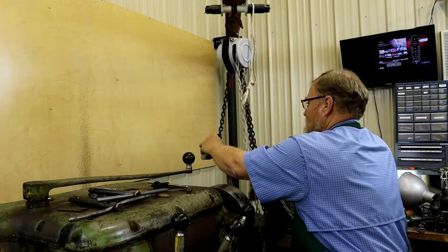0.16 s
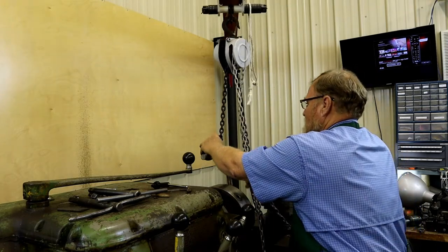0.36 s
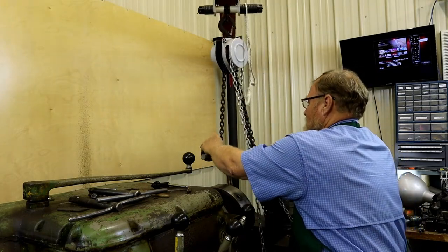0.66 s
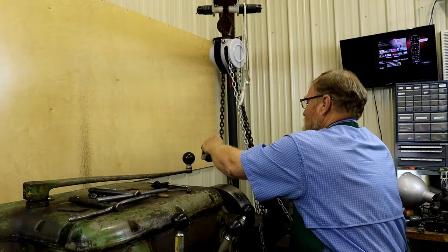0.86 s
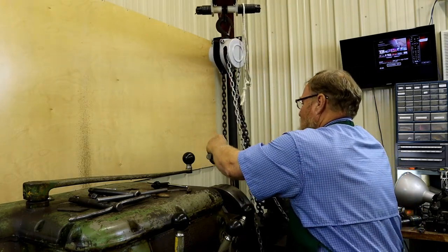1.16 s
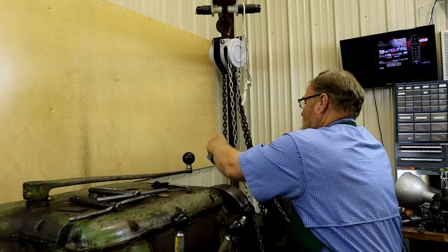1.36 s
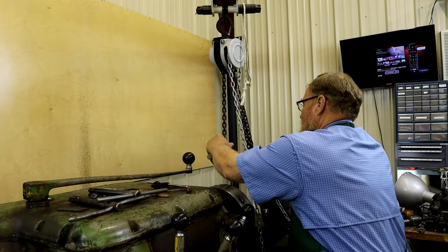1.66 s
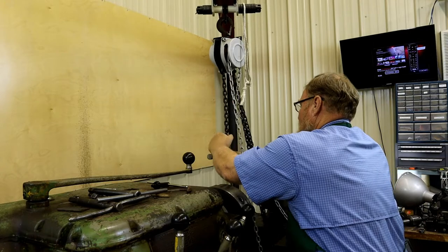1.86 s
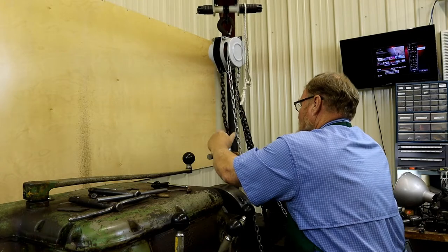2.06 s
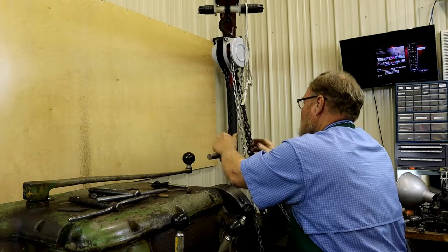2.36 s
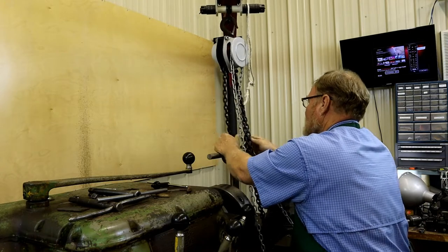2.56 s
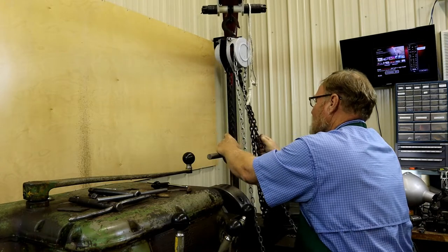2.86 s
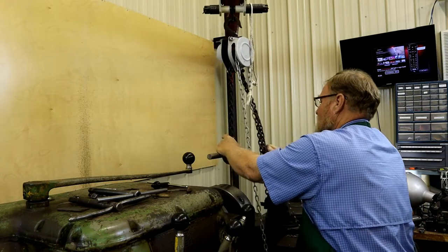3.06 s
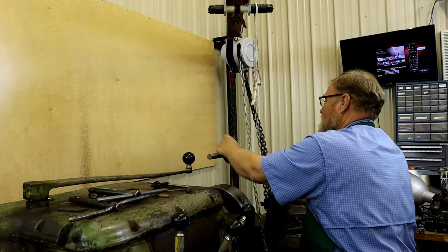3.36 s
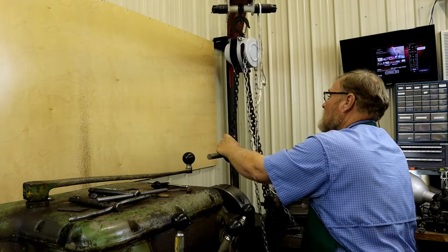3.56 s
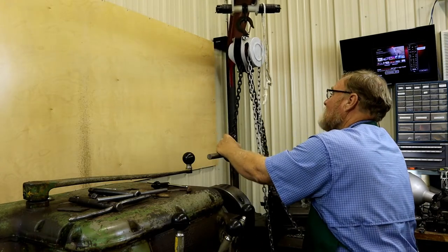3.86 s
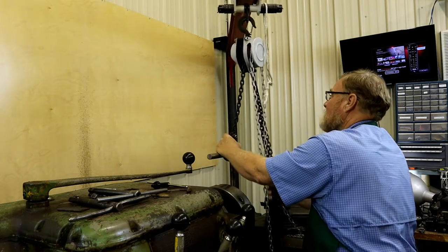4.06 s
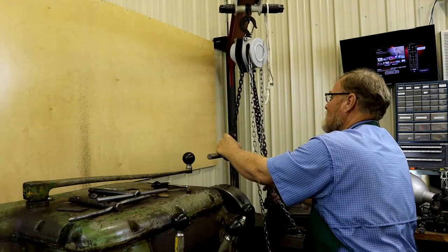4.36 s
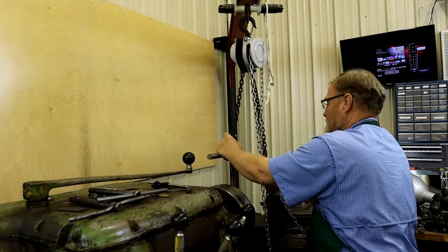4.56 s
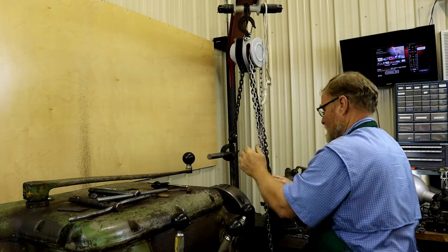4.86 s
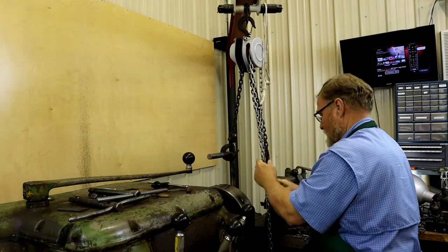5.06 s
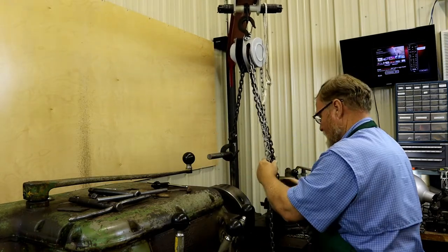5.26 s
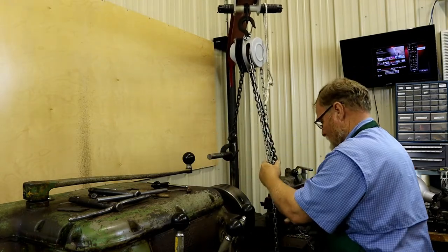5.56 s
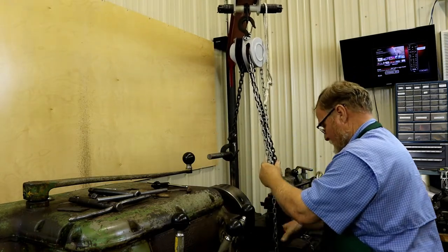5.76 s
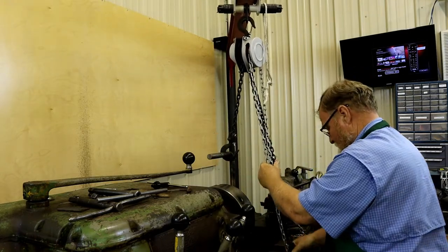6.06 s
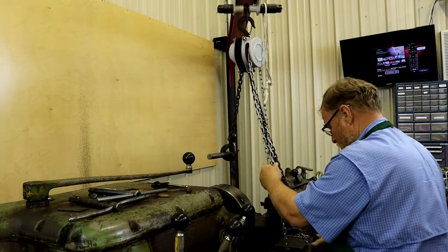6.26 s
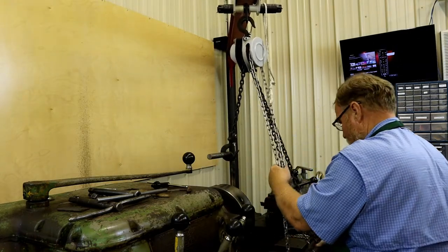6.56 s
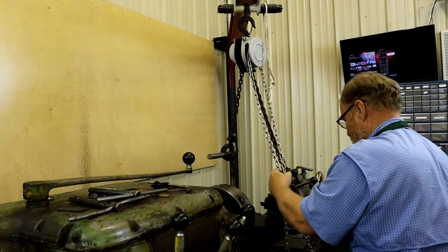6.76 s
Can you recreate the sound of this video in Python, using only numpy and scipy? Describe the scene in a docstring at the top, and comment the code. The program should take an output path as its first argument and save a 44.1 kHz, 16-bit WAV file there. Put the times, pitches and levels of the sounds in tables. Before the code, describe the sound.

A steel hand chain rattles through a clacking manual hoist in three pulls, with metal clanks and slack chain clinking in a workshop.

```python
"""Hauling a chain hoist

A hand chain is pulled through a hoist three times in a hard-walled workshop. The pawl (a small catch)
clacks over the ratchet teeth, the hand wheel rings, links jostle and the load shakes the hoist's post.
Between pulls a steel fitting clanks and scrapes, and the slack chain knocks and clinks."""
import sys
import numpy as np
from scipy import signal
from scipy.fft import rfft, irfft
from scipy.io import wavfile

SR = 44100
rng = np.random.default_rng(int(sys.argv[2]) if len(sys.argv) > 2 else 0)


def write(x):
    x = np.atleast_2d(x).T
    wavfile.write(sys.argv[1], SR, np.round(np.clip(x, -1, 1) * 32767).astype(np.int16))


N = 304731
TIME = np.arange(N) / SR
SECOND = TIME[:SR]

# ratchet speed, one list for each pull: t/s, speed/(teeth per s)
PULL_SPEEDS = [
    [(.055, 18.4), (.203, 21.2), (.208, 25.5), (.381, 24.6), (.514, 17.9)],
    [(3.235, 18.8), (3.314, 28.85), (3.501, 42.8), (3.65, 46), (3.813, 15.3)],
    [(4.151, 18), (4.261, 35.35), (4.364, 38.9), (4.505, 8.9)],
]
# strength of each pull: pawl/dB, pawl treble/dB, wheel/dB, chain/dB, jingle/dB, post shake/dB
PULL_LEVELS = [(1, -21.5, -16.5, -13, -24.5, -40.5), (3.5, -14.5, -24, -21.5, -33, -47),
               (2.5, -13.5, -29, -21, -43, -55.5)]
# tones of the hand wheel: f/Hz, level/dB, t60/s (the time to fade by 60 dB)
WHEEL_TONES = [(826, -9.5, 0.22), (1324, -5, 0.18), (1446, -15.5, 0.3), (2467, 2.5, 0.25), (2518, 0, 0.17),
               (3650, 2.5, 0.26), (3685, -2, 0.26), (3860, -6, 0.2), (5300, -19, 0.26), (4970, -19.5, 0.33),
               (10850, -15, 0.23)]
SAG_DB_PER_S = 10.5  # the arm's effort fades through a pull


def ratchet(clack_db=-3, treble_db=16, bounce_s=.003, bounce_db=-3, cover_db=-20, wheel_db=-4):
    """The pawl drops off each tooth and bounces once; its cover knocks and the hand wheel rings on."""
    # spectrum of a clack: f/Hz, level/dB
    clack_colour = [(40, -89), (200, -29), (550, -33.5), (720, -8.5), (890, -2), (1150, -26), (1350, -3),
                    (1900, -8.5), (3000, -9), (4300, -0.5), (5400, 0), (7800, -13.5), (11000, -9),
                    (15800, -18)]
    # tones of the steel cover around the pawl: f/Hz, level/dB, t60/s
    cover_tones = [(848, -7, 0.13), (884.6, -4.5, 0.11), (932, -8.5, 0.12), (1343, -10.5, 0.25),
                   (1910, -1, 0.052), (4334, 3, 0.028), (5200, -5, 0.24)]
    # at higher speed the pawl has less time to fall, but the wheel is struck harder
    pawl_db_per_doubling, wheel_db_per_doubling = -2, 3.5
    snaps, cover, wheel = np.zeros(N), np.zeros(N), np.zeros(N)
    for speed, (pawl_db, bright_db, ring_db, *_) in zip(PULL_SPEEDS, PULL_LEVELS):
        tilt = [(4500, 0), (11000, bright_db + treble_db)]
        times, doublings = teeth(speed)
        uneven_db = rng.standard_normal((len(times), 2)) * (1, 2)
        for s, fast, (pawl_luck, wheel_luck) in zip(times, doublings, uneven_db):
            db = pawl_db - SAG_DB_PER_S * (s - times[0]) + pawl_db_per_doubling * fast + pawl_luck
            for delay, drop_db in [(0, 0), (bounce_s * rng.uniform(.7, 1.4), bounce_db)]:
                snap = contact(t60=0.023, rise_s=0.0022)
                add(snaps, s + delay, undb(db + drop_db) * colour(snap, tilt, keep_power=False))
            # the cover answers on the bounce, at a slightly different pitch each time
            add(cover, s + bounce_s, undb(db) * ring(cover_tones, scatter_db=0.5, detune=.012))
            strike_db = ring_db + wheel_db_per_doubling * fast + wheel_luck
            add(wheel, s, undb(strike_db) * ring(WHEEL_TONES, scatter_db=-1.5, detune=0.0011))
    clacks = undb(clack_db) * colour(snaps, clack_colour) + undb(cover_db) * cover
    return clacks, undb(wheel_db) * wheel


def teeth(speed):
    """When the pawl falls off each tooth, and the speed then, in doublings of the average listed speed."""
    s, rate = np.transpose(speed)
    t = np.arange(s[0], s[-1], 1 / SR)
    passed = np.cumsum(np.interp(t, s, rate)) / SR
    times = np.interp(np.arange(np.ceil(passed[-1])), passed, t)
    return times, np.log2(np.interp(times, s, rate) / rate.mean())


def running_chain(chain_db=-5, hits_per_s=420, kinds=16):
    """Links bump at random when pulled or stirred; each kind of bump has its own short crash."""
    # spectrum of the rattle: f/Hz, level/dB
    rattle_colour = [(40, -43), (160, -27.5), (380, -6.5), (600, -5.5), (880, 6), (1180, -3.5), (1350, -2),
                     (2200, -1), (3100, -0.5), (3900, -1), (5200, -6), (8500, -15.5), (11000, -19),
                     (16000, -36)]
    # slack chain gathered up or left swinging: t/s, length/s, level/dB
    stirs = [(0, 0.029, -18), (.53, 0.13, -24.5), (.8, 0.048, -48), (3.14, 0.08, -24.5), (3.8, 0.084, -28),
             (3.95, 0.3, -38), (4.1, 0.057, -26), (4.58, 0.2, -45), (5.39, 0.055, -42), (5.64, 0.12, -45.5),
             (5.97, 0.12, -41.5), (6.46, 0.12, -32.5), (6.6, .17, -25)]
    rattle = np.zeros(N)
    for _ in range(kinds):
        bumps = impacts(hits_per_s / kinds, spread_db=3.5)
        rattle += signal.oaconvolve(bumps, contact(t60=0.012))[:N]
    levels_db = [db for *_, db, _, _ in PULL_LEVELS]
    hauled = hauling(levels_db, attack_s=0.017, release_t60=0.31, lead_s=0.0092, overrun_s=-0.022)
    stirred = swells(stirs, attack_s=0.014, release_t60=0.26)
    return undb(chain_db) * unit(colour(rattle, rattle_colour)) * np.hypot(hauled, stirred)


def steel_knocks(knock_db=-4, treble_db=20, bass_db=22):
    """Short steel knocks: a first click of the pawl, then slack chain landing on the hoist and post."""
    # each knock: t/s, level/dB, treble/dB, bass/dB
    knocks = [(0.039, -10.5, -15, -38), (0.601, -14, -18, -22), (0.881, -34, -34, -40),
              (0.952, -30.5, -26, -22), (0.9935, -26.5, -32, -31), (1.21, -27, -22, -9.5),
              (1.456, -73, -16, -32), (1.551, -38, -22, -40), (3.152, -14, -30, -19.5),
              (4.041, -27, -23, -14), (4.673, -30, -11, -13), (4.983, -27, -62, -6), (5.395, -31, -61, -3),
              (5.727, -23.5, -32, -13), (6.158, -30.5, -63, -7.5), (6.514, -20.5, -9.5, -16.5),
              (6.6113, -4, -26, -27.5), (6.786, -13.5, -13, -35)]
    # spectrum of a knock: f/Hz, level/dB
    knock_colour = [(30, -22), (150, -14.5), (400, -9), (900, 3.5), (1250, 1.5), (2000, 2.5), (3700, -0.5),
                    (5500, -0.5), (12000, -24), (16000, -31)]
    out = np.zeros(N)
    for s, db, bright_db, low_db in knocks:
        tilt = [(350, low_db + bass_db), (800, 0), (4000, 0), (9000, bright_db + treble_db)]
        add(out, s, undb(db) * colour(contact(t60=0.074, rise_s=0.0008), tilt, keep_power=False))
    return undb(knock_db) * colour(out, knock_colour)


def fitting_clanks(steel_db=-3):
    """Each blow makes the steel fitting crack and ring; a harder contact sounds brighter."""
    # each blow: t/s, level/dB, f/Hz where the treble starts to fall, bass/dB, ring/dB
    blows = [(1.955, -22.5, 2240, 3, -40), (1.968, -26, 11900, 13, -51), (1.982, -17, 4570, 8, -27),
             (2.004, -4, 4900, 1.5, -22), (2.169, -19.5, 2288, -8, -30), (2.204, -15, 6200, 8.5, -34.5),
             (2.2105, -7.5, 14100, -26, -27), (2.222, -15, 13000, -7, -44), (2.733, -41, 9100, 12, -41),
             (2.753, -16.5, 8000, -7, -37)]
    # spectrum of the crack: f/Hz, level/dB
    crack_colour = [(40, -20), (160, -14), (290, -8), (600, -8.5), (970, 2), (1320, -8.5), (2050, 1.5),
                    (2400, -1), (4400, -6.5), (6000, -4.5), (7800, -12.5), (12500, -6), (16000, -16)]
    # tones of the fitting: f/Hz, level/dB, t60/s
    steel_tones = [(255, -19, 0.92), (369, -16.5, 0.75), (970, 2, 0.23), (1592, 0.5, 0.11),
                   (1943, 5.5, 0.13), (2034, 5.5, 0.15), (2076, 2.5, 0.29), (2500, -7, 0.27),
                   (3300, -1.5, 0.17), (3950, -27, 0.25), (4400, -8, 0.26), (5000, -9, 0.14),
                   (6052, -2.5, 0.13), (6890, 0, 0.21), (8360, -10, 0.31), (9300, -9, 0.24),
                   (10700, 0, 0.25), (12300, -11, 0.26)]
    cracks, rings = np.zeros(N), np.zeros(N)
    for s, db, top_hz, low_db, ring_db in blows:
        tilt = [(400, low_db), (1200, 0), (top_hz, 0), (1.8 * top_hz, -15), (7.8 * top_hz, -35)]
        add(cracks, s, undb(db) * colour(contact(t60=0.031), tilt, keep_power=False))
        add(rings, s, undb(ring_db) * colour(ring(steel_tones), tilt, keep_power=False))
    return colour(cracks, crack_colour), undb(steel_db) * rings


def link_clinks(wheel_db=-20):
    """A free link is struck and rings, and the hand wheel rings faintly with it."""
    # each clink: t/s, ring/dB, pitch/Hz, hit/dB
    clinks = [(0.9944, -51, 4470, -52), (1.633, -36.5, 4020, -45), (1.708, -31.5, 3988, -24),
              (2.51, -44, 2840, -46), (3.004, -45.5, 2780, -56), (4.863, -56, 4030, -52),
              (5.098, -56, 4030, -40), (5.222, -50, 4100, -45), (6.7933, -22, 4180, -3)]
    # tones of a link: multiple of the pitch, level/dB, t60/s
    link_tones = [(.912, -9, .13), (.975, 1, .06), (1, 0, .33), (1.006, -6, .2), (1.035, -1, .05),
                  (1.21, -20, .25), (2.71, -20, .25)]
    hits, rings = np.zeros(N), np.zeros(N)
    for s, ring_db, hz, hit_db in clinks:
        shape = [(300, -25), (800, -9), (0.64 * hz, -16), (hz, 0), (1.48 * hz, -11), (15500, -17)]
        add(hits, s, undb(hit_db) * colour(contact(t60=0.016), shape))
        add(rings, s, undb(ring_db) * (ring(link_tones, hz) + undb(wheel_db) * ring(WHEEL_TONES)))
    return hits, rings


def jingle(jingle_db=-2):
    """Hanging links ring as their neighbours nudge them, during each pull and just after."""
    # where the links ring: f/Hz, width/Hz, level/dB
    link_peaks = [(3680, 92, -2.5), (4160, 140, 4), (10920, 120, -9.5)]
    levels_db = [db for *_, db, _ in PULL_LEVELS]
    nudged = hauling(levels_db, attack_s=0.022, release_t60=0.55, lead_s=0.045, overrun_s=0.14)
    return undb(jingle_db) * unit(resonate(impacts(per_s=550, spread_db=10), link_peaks)) * nudged


def scrape(scrape_db=-3):
    """Sliding steel sticks and slips, and the tiny jerks sound the fitting's low tones."""
    # where the fitting rings: f/Hz, width/Hz, level/dB
    fitting_peaks = [(257, 29, -4), (412, 38, -7), (480, 163, -4.5), (770, 200, -6.5), (970, 20, 4.5),
                     (1595, 32, -5.5), (2064, 12, -0.5), (2700, 120, -14)]
    # each slide: t/s, length/s, level/dB
    slides = [(1.09, 0.043, -45), (1.19, 0.053, -44.5), (2.37, 0.047, -40), (2.5, 0.12, -38),
              (2.75, 0.057, -34.5), (3.02, 0.1, -43.5)]
    grinding = unit(resonate(impacts(per_s=750, spread_db=11.5), fitting_peaks))
    return undb(scrape_db) * grinding * swells(slides, attack_s=0.017, release_t60=0.3)


def ticks(tick_t60=0.011, faint_db=-44):
    """Dry ticks close by: a few sharp ones, and faint ones as the chain slips through the fingers."""
    # the sharp ticks: t/s, level/dB
    sharp_ticks = [(1.475, -33.5), (1.733, -42), (1.8771, -41), (2.0896, -24), (2.4826, -31),
                   (4.815, -27.5), (4.8638, -32.5), (5.1386, -32), (5.424, -35.5), (5.911, -18.5),
                   (6.0133, -29), (6.111, -30), (6.4162, -21.5), (6.437, -20.5), (6.466, -23.5)]
    # spectrum of a tick: f/Hz, level/dB
    tick_colour = [(60, 3), (400, -2), (1000, -7), (3000, -3), (6000, 3), (11000, 1), (16000, -6)]
    fingering = envelope(start_s=4.6, end_s=6.5, attack_s=.05, release_t60=.1)
    faint = impacts(per_s=18, spread_db=3) * fingering
    out = undb(faint_db) * signal.oaconvolve(faint, contact(tick_t60))[:N]
    for s, db in sharp_ticks:
        add(out, s, undb(db) * contact(tick_t60))
    return colour(out, tick_colour)


def wall_boom(boom_db=-3, rest_db=-65):
    """Pulls and jolts shake the post and make the wall boom."""
    # where the wall booms: f/Hz, width/Hz, level/dB
    wall_peaks = [(60, 7.3, -36), (84, 4.6, -0.5), (126.4, 3.1, 5), (205, 55, -11), (245.7, 9.6, -7)]
    # jolts of the load on the post: t/s, level/dB
    jolts = [(.57, -37), (1.2, -50), (1.98, -49.5), (2.75, -59), (3.14, -44), (3.88, -46), (4.52, -44),
             (5.0, -52), (5.37, -45.5), (5.72, -49.5), (6.61, -31)]
    levels_db = [db for *_, db in PULL_LEVELS]
    hauled = hauling(levels_db, attack_s=0.021, release_t60=.5, lead_s=0.12, overrun_s=0)
    jolted = swells([(s, 0.042, db) for s, db in jolts], attack_s=0.086, release_t60=0.39)
    rumble = unit(resonate(impacts(per_s=300, spread_db=6.5), wall_peaks))
    return undb(boom_db) * rumble * (np.hypot(hauled, jolted) + undb(rest_db))


def air(air_db=-51.5):
    """The quiet rush of the workshop, which slowly swells a little."""
    # spectrum of the rush: f/Hz, level/dB
    rush_colour = [(15, -15), (25, -5.5), (97, 0.5), (175, -5), (277, -2), (624, -4), (887, -0.5),
                   (1160, -7.5), (4030, -10.5), (4370, -12.5), (12500, -23), (16000, -23)]
    # its slow swell: t/s, level/dB
    swell = [(1, -5.5), (1.7, -3.5), (3, 1.5), (5.4, 0.5), (6.4, 0)]
    rush = unit(colour(rng.standard_normal(N), rush_colour))
    return undb(air_db + np.interp(TIME, *np.transpose(swell))) * rush


def echoes(early_db=-6, late_db=-2, first_s=0.0028):
    """The room's answer to a click: quick echoes off nearby walls and the hoist, then a fading tail."""
    # how long the room rings: f/Hz, t60/s
    decay_times = [(150, 0.57), (800, 0.38), (4000, 0.46), (9000, 0.54), (15000, 0.42)]
    hz = np.fft.rfftfreq(SR, 1 / SR)
    edges = np.append(0, np.geomspace(SR / 256, SR / 2, 8))
    noise = rfft(rng.standard_normal(SR))
    late = np.zeros(SR)
    for low, high in zip(edges, edges[1:]):
        band = irfft(noise * (hz >= low) * (hz < high))
        late += band * fade(on_log_axis((low + high) / 2, decay_times))
    early = contact(t60=0.057)
    onset = np.clip(SECOND / first_s - 1, 0, 1)
    return (undb(early_db) * unit(onset * early) + undb(late_db) * unit(onset * late)) / np.sqrt(SR)


def room(x, cycles_per_s=6):
    """Hits wander along the chain, so their paths to the walls change: swing between two sets of echoes."""
    place = 2 * np.pi * cycles_per_s * TIME
    return sum(signal.fftconvolve(x * share, echoes())[:N] for share in (np.cos(place), np.sin(place)))


def stereo(mid, side, pan_db=-.3):
    """Left and right are nearly alike: a little of the side sound is added to one, taken from the other."""
    # how much side sound is used: f/Hz, level/dB
    width = [(100, -15), (280, -11), (550, -22), (2500, -20), (8000, -14), (14000, -11)]
    sign = np.array([[1], [-1]])
    return mid * undb(sign * pan_db / 2) + sign * colour(side, width, keep_power=False)


def contact(t60, rise_s=0.00027):
    """The brief crash of steel meeting steel: a burst of noise."""
    return rng.standard_normal(SR) * fade(t60) * (1 - np.exp(-SECOND / rise_s))


def ring(tones, scale=1, scatter_db=1, detune=0.0024):
    """Fading tones of a struck part; each blow lands elsewhere and so mixes them differently."""
    out = np.zeros(SR)
    for (hz, db, t60), (mistune, strength, phase) in zip(tones, rng.standard_normal((len(tones), 3))):
        tone_hz = hz * scale * (1 + detune * mistune)
        wave = np.sin(2 * np.pi * tone_hz * SECOND + np.pi * phase)
        out += undb(db + scatter_db * strength) * wave * fade(t60)
    return out


def impacts(per_s, spread_db):
    """Clicks at random moments, of uneven size and sign."""
    size = undb(spread_db * np.clip(rng.standard_normal(N), -2, 2)) * rng.choice([-1, 1], N)
    return size * (rng.random(N) < per_s / SR)


def resonate(x, peaks):
    """Make a sound ring at the given peaks; each filter runs twice for steeper sides."""
    filters = [(signal.iirpeak(hz, hz / (2 * width), fs=SR), db) for hz, width, db in peaks]
    return sum(undb(db) * signal.lfilter(*f, signal.lfilter(*f, x)) for f, db in filters)


def hauling(levels_db, attack_s, release_t60, lead_s, overrun_s):
    """Loudness of something the pulls drive: it starts before the first tooth and fades with the effort."""
    gain = np.zeros(N)
    for speed, db in zip(PULL_SPEEDS, levels_db):
        start, end = speed[0][0], speed[-1][0]
        effort = undb(db - SAG_DB_PER_S * np.clip(TIME - start, 0, end - start))
        gain += effort * envelope(start - lead_s, end + overrun_s, attack_s, release_t60)
    return gain


def swells(moves, attack_s, release_t60):
    """Loudness over time of a list of movements: t/s, length/s, level/dB."""
    return sum(undb(db) * envelope(s, s + length, attack_s, release_t60) for s, length, db in moves)


def envelope(start_s, end_s, attack_s, release_t60):
    """Rise from the start, hold until the end, then die away."""
    rise = np.clip((TIME - start_s) / attack_s, 0, 1)
    return rise * np.exp(-np.log(1000) * np.maximum(TIME - end_s, 0) / release_t60)


def fade(t60):
    """A one-second curve that falls 60 dB every t60 seconds."""
    return np.exp(-np.log(1000) * SECOND / t60)


def colour(x, points, keep_power=True):
    """Shape a sound's bass and treble to follow the points: f/Hz, level/dB."""
    size = 4096
    gain = undb(on_log_axis(np.fft.rfftfreq(size, 1 / SR), points))
    cepstrum = irfft(np.log(unit(gain) if keep_power else gain))
    # fold the second half onto the first, so the filter never sounds ahead of a hit
    cepstrum[1:size // 2] *= 2
    cepstrum[size // 2 + 1:] = 0
    response = irfft(np.exp(rfft(cepstrum)))
    return signal.fftconvolve(x, response)[:len(x)]


def on_log_axis(hz, points):
    """Read between (f/Hz, value) points, with octaves evenly spaced."""
    f, value = np.transpose(points)
    return np.interp(np.log(hz + 1), np.log(f), value)


def add(track, s, sound):
    """Mix a sound into the track at s seconds."""
    start = max(int(s * SR), 0)
    track[start:start + len(sound)] += sound[:N - start]


def undb(db):
    """Turn decibels into a factor to multiply by."""
    return 10 ** (np.asarray(db) / 20)


def unit(x):
    """Scale to an average power of 1."""
    return x / np.sqrt(np.mean(x ** 2))


def scene(pawl_echo_db=-3, ring_echo_db=-6, tick_echo_db=-8):
    """Mix all the sources, each with its own share of room echo."""
    clacks, wheel = ratchet()
    cracks, steel = fitting_clanks()
    link_hits, link_rings = link_clinks()
    handling = running_chain() + steel_knocks() + cracks + scrape() + link_hits + wall_boom()
    rings = wheel + steel + link_rings + jingle()
    near = ticks()
    to_room = handling + undb(pawl_echo_db) * clacks + undb(ring_echo_db) * rings + undb(tick_echo_db) * near
    mid, side = (room(to_room) + air() for _ in range(2))
    return stereo(handling + clacks + rings + near + mid, side)


def record(dry):
    """Round off the loudest peaks and cut the highest treble."""
    ceiling, top_hz = 1.12, 16000
    rounded = dry / (1 + (dry / ceiling) ** 4) ** (1 / 4)
    return signal.sosfilt(signal.ellip(8, .2, 70, top_hz, fs=SR, output="sos"), rounded)


dry = scene()
out = record(dry)
write(out)
```